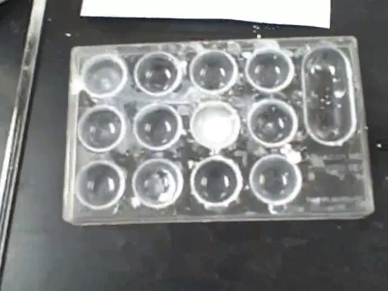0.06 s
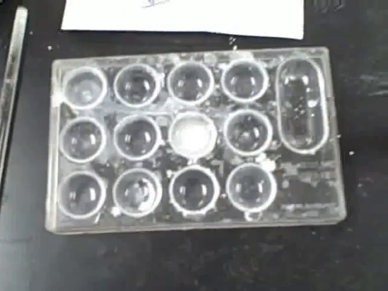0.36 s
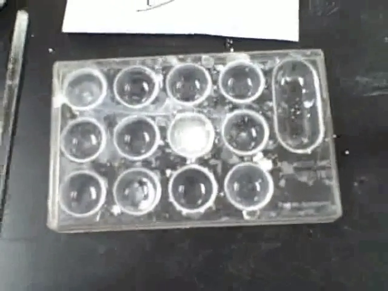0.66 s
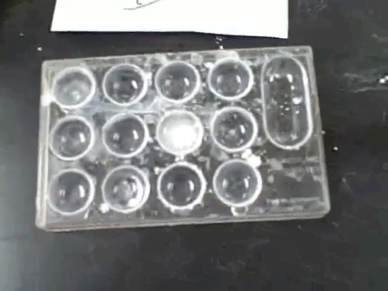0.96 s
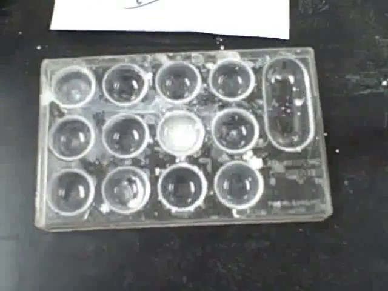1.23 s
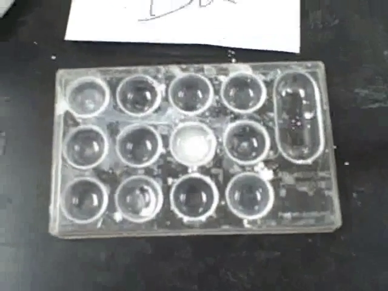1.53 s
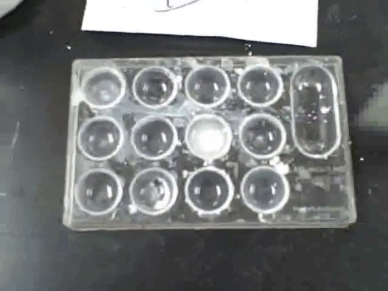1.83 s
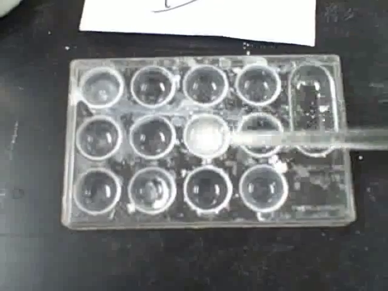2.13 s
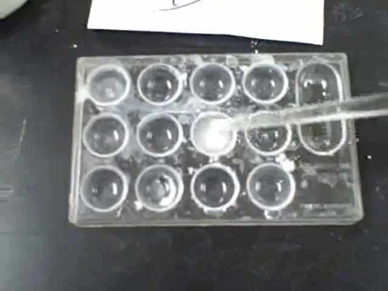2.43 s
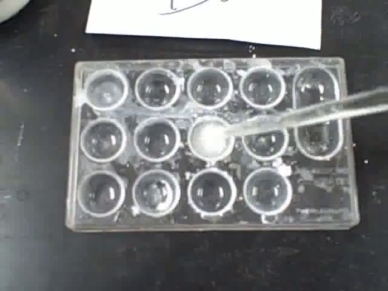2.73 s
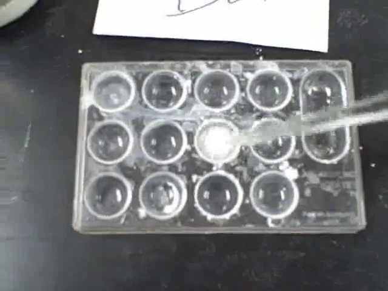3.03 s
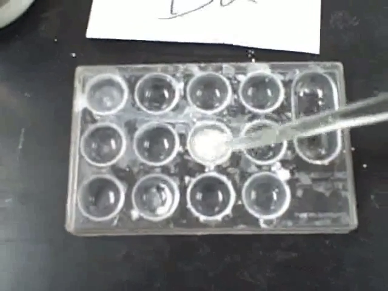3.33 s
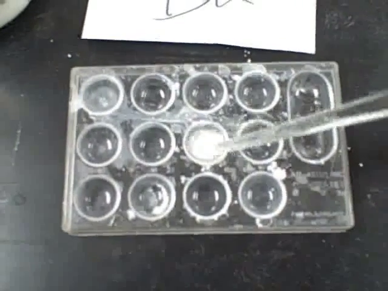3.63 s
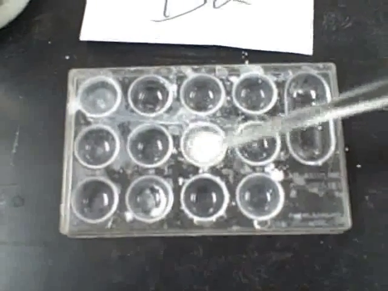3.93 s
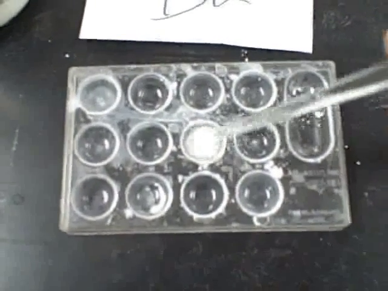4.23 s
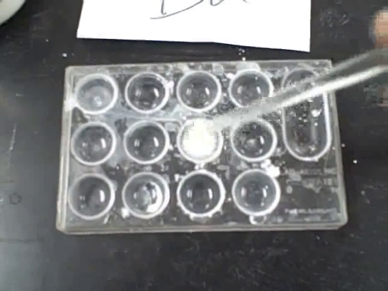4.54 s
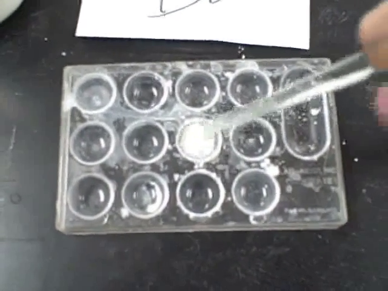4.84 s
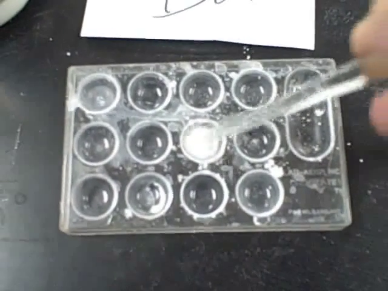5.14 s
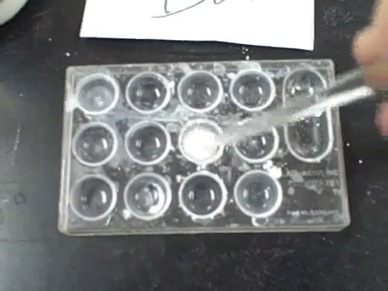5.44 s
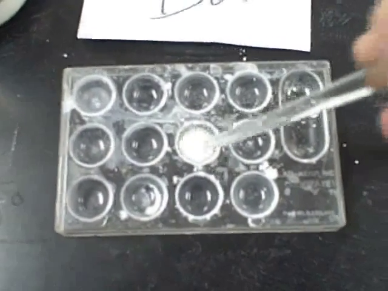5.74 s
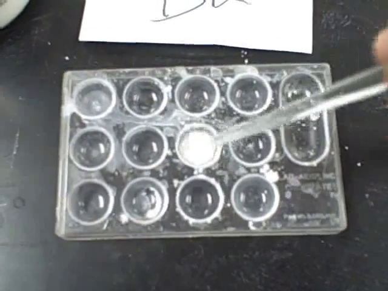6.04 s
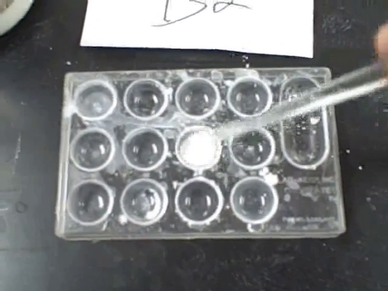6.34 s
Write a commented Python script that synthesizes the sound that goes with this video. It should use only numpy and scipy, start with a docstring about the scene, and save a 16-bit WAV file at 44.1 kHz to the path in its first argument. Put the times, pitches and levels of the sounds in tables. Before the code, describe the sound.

In a small, quiet lab with faint ventilation and mains hum, a glass rod slides softly on the bench and clinks against a second one. A moment later it lands with a short rattle in a plastic well. Then it grinds wet powder in uneven, scratchy strokes, crunching clumps and ticking against the plastic wall, with one bright rasp near the end. All is heard close up.

```python
"""A faint high swish, then a glass rod scuffs over a lab bench and clinks against its neighbour.
It rattles into a well of a plastic plate and stirs wet powder: gritty friction rings plate and rod,
clumps crunch, one with a bright rasp, and the tip taps the well's wall about every half turn.
All of it is close by, in a small, quiet room with ventilation and mains hum."""
import sys
import numpy as np
from scipy import signal
from scipy.fft import rfft, irfft, next_fast_len
from scipy.io import wavfile
from scipy.ndimage import map_coordinates

SR = 44100
rng = np.random.default_rng(int(sys.argv[2]) if len(sys.argv) > 2 else 0)


def unload_wav(signal):
    """Save mono or channel-first audio to the path in sys.argv[1] as 16-bit WAV at rate SR, clipped to [-1, 1]."""
    wavfile.write(
        sys.argv[1],
        SR,
        np.round(np.clip(np.atleast_2d(signal).T, -1, 1) * 32767).astype(np.int16),
    )


N = 286204


def amp(db):
    """Decibels to gain."""
    return 10 ** (np.asarray(db) / 20)


def unit(x):
    """Each row at rms 1."""
    return x / np.sqrt(np.mean(x ** 2, axis=-1, keepdims=True) + 1e-20)


def along(points, hz):
    """(freq_hz, value) points read on a log axis."""
    freqs_hz, values = np.transpose(points)
    return np.interp(np.log(hz + 1), np.log(freqs_hz + 1), values)


def wobble(rate_hz):
    """Smooth random curve."""
    knots = rng.standard_normal(int(N * rate_hz / SR) + 4)
    return map_coordinates(knots, [np.arange(N) * rate_hz / SR])


def filtered(x, response):
    """x through a gain that is a function of frequency."""
    size = next_fast_len(x.shape[-1] + SR // 4)
    return irfft(rfft(x, size) * response(np.fft.rfftfreq(size, 1 / SR)), size)[..., :x.shape[-1]]


def equalised(x, spectrum):
    """x shaped by (freq_hz, gain_db) points."""
    return filtered(x, lambda hz: amp(along(spectrum, hz)))


def coloured(x, spectrum):
    """x equalised, at rms 1."""
    return unit(equalised(x, spectrum))


def add(track, start_s, sound):
    """Mix a sound into the track."""
    part = track[max(round(start_s * SR), 0):][:len(sound)]
    part += sound[:len(part)]


def stroke(start_s, end_s, rise_s, fall_s, ramp_db=0):
    """Stroke gain: up 40 dB in rise_s, a steady change of pressure, down 40 dB in fall_s."""
    t = np.arange(N) / SR
    outside = np.maximum(start_s - t, 0) / rise_s + np.maximum(t - end_s, 0) / fall_s
    progress = np.clip((t - start_s) / (end_s - start_s), 0, 1) - .5
    return amp(ramp_db * progress - 40 * np.minimum(outside, 5))


def grit(slips_per_s, spread_db, hiss_gain):
    """Friction force: tiny slips of very unequal size over a smooth hiss."""
    slipping = rng.random(N) < slips_per_s / SR
    sizes = amp(spread_db * np.clip(rng.standard_normal(N), -2, 2))
    slips = slipping * sizes * rng.choice([-1, 1], N)
    return unit(unit(slips) + hiss_gain * rng.standard_normal(N))


def ring(modes, t, scatter_db):
    """Damped modes; their strengths scatter with the point of contact."""
    out = np.zeros(len(t))
    for k, (hz, width_hz, db) in enumerate(modes):
        strength = (-1) ** k * width_hz * amp(db + scatter_db * rng.standard_normal())
        out += strength * np.exp(-np.pi * width_hz * t) * np.sin(2 * np.pi * hz * t)
    return unit(out)


def rubbed(force, modes):
    """A friction force heard through a body's modes, at rms 1."""
    response = ring(modes, np.arange(SR // 8) / SR, scatter_db=0)
    return unit(signal.fftconvolve(force, response)[:N])


def roaming(x, depth_db, span_hz, span_s):
    """As the contact moves, neighbouring modes swell and fade in patches."""
    hz, t, spectra = signal.stft(x, SR, nperseg=256)
    grid = np.meshgrid(hz / span_hz, t / span_s, indexing="ij")
    patches = map_coordinates(rng.standard_normal((200, 1000)), grid, mode="wrap")
    return unit(signal.istft(spectra * amp(depth_db * patches), SR, nperseg=256)[1][:N])


# room air spectrum: freq_hz, gain_db
AIR_SPECTRUM = [(12, -45.5), (20, -3), (41, -9), (59, -18.5), (123, -15.5), (247, -26), (268, -27),
                (300, -21), (456, -33.5), (554, -33), (797, -34.5), (942, -38), (3130, -45), (10100, -43.5),
                (15800, -44.5)]
# ventilation and mains lines: pitch_hz, rms_db
HUM_LINES = [(30.5, -65.5), (119.8, -66), (240, -77), (570, -75)]

def room_tone(air_db=-56.5):
    """Ventilation rumble with slightly unsteady hum."""
    t, hum = np.arange(N) / SR, np.zeros(N)
    for hz, db in HUM_LINES:
        peak = np.sqrt(2) * amp(db + 0.74 * wobble(1))
        hum += peak * np.sin(2 * np.pi * hz * t + .5 * wobble(0.96))
    return amp(air_db) * coloured(rng.standard_normal(N), AIR_SPECTRUM) + hum


# room decay: freq_hz, t60_s
ROOM_DECAY = [(200, 0.341), (1300, 0.21), (5000, 0.34), (10000, 0.5), (16000, 0.1)]

def reverb(x, build_s=0.0012):
    """The lab's short, diffuse answer."""
    hz, t, spectra = signal.stft(rng.standard_normal(SR // 2), SR, nperseg=256)
    decay = amp(-60 * t / along(ROOM_DECAY, hz)[:, None])
    tail = signal.istft(spectra * decay, SR, nperseg=256)[1]
    tail *= 1 - np.exp(-np.arange(len(tail)) / SR / build_s)
    wet = signal.fftconvolve(x, tail / np.linalg.norm(tail))[:N]
    return equalised(wet, [(300, -21.5), (1300, -9), (5000, -19.5), (10000, -28), (15500, -24)])


def swish(centre_s=0.14, sigma_s=0.072, level_db=-55):
    """Soft, high brushing noise in one bell-shaped swell."""
    spectrum = [(1600, -23), (2300, 1), (2800, -2), (3500, -7.5), (7000, -2.5), (11000, 1.5), (15500, 6)]
    hiss = coloured(rng.standard_normal(N), spectrum)
    swell = np.exp(-.5 * np.minimum(((np.arange(N) / SR - centre_s) / sigma_s) ** 2, 50))
    return amp(level_db) * swell * hiss


# modes of the scuff and of the rod lying damped on the bench: freq_hz, width_hz, level_db
SCUFF_MODES = [(1090, 120, -1.5), (1408, 150, -5.5), (1990, 140, 2), (2430, 310, -1.5), (3234, 390, -1.5),
               (3980, 311, 0.5), (5890, 770, -5.5)]
LYING_ROD_MODES = [(8830, 320, -9), (11950, 300, -4), (12220, 340, 0), (15550, 450, -2)]
# pushes over the bench: start_s, end_s, sing_db, scuff_db
PUSHES = [(0.822, 0.848, -50, -56.5), (0.88, 1.168, -58.5, -69.5), (0.989, 0.988, -61, -68.5)]

def slide(rise_s=0.12, fall_s=0.089):
    """The dragged rod scuffs the bench and faintly sings."""
    force = grit(slips_per_s=1500, spread_db=5, hiss_gain=.7)
    hiss = amp(-1) * coloured(force, [(3000, -22), (7000, 2), (15500, 4.5)])
    sing = roaming(rubbed(force, LYING_ROD_MODES) + hiss, depth_db=2.5, span_hz=500, span_s=.03)
    scuff = rubbed(force, SCUFF_MODES)
    return sum(stroke(start_s, end_s, rise_s, fall_s) * (amp(sing_db) * sing + amp(scuff_db) * scuff)
               for start_s, end_s, sing_db, scuff_db in PUSHES)


# modes of the two rods: pitch_hz, level_db, t60_s
GLASS_MODES = [(5790, -21, .07), (5884, -28, .16), (8545, -11, .11), (8565, -29, .32), (8730, -5, .1),
               (10320, -27, .1), (11812, -1, .085), (11845, -22, .24), (12100, -22, .17), (14300, -25, .1),
               (15430, -17, .06), (15573, 0, .07), (15765, -9, .07)]
# glass on glass: start_s, ring_db, tick_db, bench_re_tick_db
GLASS_HITS = [(1.1962, -31, -31, 0.5), (1.2029, -30.5, -42.5, -4.5), (1.2425, -42, -41.5, -16.5)]

def clinks(snap_t60_s=0.012, bench_t60_s=0.11):
    """The rod bounces off its neighbour: glass snaps, the bench answers, close pairs of modes beat."""
    out, t = np.zeros(N), np.arange(SR // 2) / SR
    spectrum = [(80, -6.5), (500, -6), (1600, -1.5), (4000, -4), (7000, -2), (10000, -5), (15500, 7.5)]
    for start_s, ring_db, tick_db, bench_db in GLASS_HITS:
        chime = np.zeros(len(t))
        for hz, db, t60_s in GLASS_MODES:
            decay = amp(db + .5 * rng.standard_normal() - 60 * t / t60_s)
            chime += decay * np.sin(2 * np.pi * (hz * t + rng.random()))
        noise = coloured(rng.standard_normal(len(t)), spectrum)
        tick = unit(noise * (amp(-60 * t / snap_t60_s) + amp(bench_db - 60 * t / bench_t60_s)))
        add(out, start_s, amp(ring_db) * unit(chime) + amp(tick_db - 0.5) * tick)
    return out


def rasp(start_s=6.177, end_s=6.205, level_db=-38):
    """A dry clump is crushed: crystals break in a dense, bright crackle."""
    force = grit(slips_per_s=900, spread_db=4, hiss_gain=.3)
    spectrum = [(1500, -17), (4000, 0.5), (7000, 0), (10000, -7), (13000, -8), (15500, 1.5)]
    return amp(level_db) * stroke(start_s, end_s, rise_s=0.021, fall_s=0.024) * coloured(force, spectrum)


# register boundaries: crossover_hz
CROSSOVERS_HZ = [880, 2200, 8000]

def registers(x):
    """x split, low to high, into thud, body, clack and edge, each at rms 1."""
    def bands(hz):
        lowpasses = [1 / (1 + (hz / crossover_hz) ** 10) for crossover_hz in CROSSOVERS_HZ]
        return np.diff(lowpasses, axis=0, prepend=0, append=1)
    return unit(filtered(x, bands))


# contact crack, too dense in modes to ring: freq_hz, gain_db
CRACK_SPECTRUM = [(80, -19), (250, -15), (480, 3), (720, 4.5), (1300, 1.5), (2500, -6.5), (4000, -11.5),
                  (6000, -6), (8500, -15), (11000, -10), (14000, -10.5), (16000, -31.5)]

def crack(t, hold_s=0.0043, t60_s=0.038):
    """A burst that lasts while the contact chatters, then dies."""
    noise = coloured(rng.standard_normal(len(t)), CRACK_SPECTRUM)
    return unit(noise * amp(-60 * np.maximum(t - hold_s, 0) / t60_s))


# modes of the plate and of the hand-held rod, tip in the powder: freq_hz, width_hz, level_db
PLATE_MODES = [ (509, 740, -17), (819, 160, -9), (1028.5, 64, 6), (1185, 248, 2.5), (1300, 95, 8),
               (1466, 83, 2), (1624, 18.2, 3), (1707, 46, -5.5), (2370, 194, -15), (2586, 84, -11.5),
               (2777, 50, -13), (2954, 40, -14.5), (3515, 42, -10.5), (3800, 97, -14), (4380, 56, -8.5),
               (4797, 78, -10), (5236, 98, -12), (5675, 78, -9), (6570, 410, -16), (6353, 78, -12.5),
               (7300, 100, -23.5), (8260, 79, -27), ]
HELD_ROD_MODES = [(9500, 160, -16), (10450, 450, -12), (10930, 260, -4), (11320, 240, -4),
                  (12400, 250, -24), (13200, 350, -18), (13800, 350, -17), (14500, 450, -22),
                  (15400, 600, -21)]

def blows(hits, thud_base_db, clack_base_db, trim_db=-18.5):
    """Glass hits plastic: a bare wall gives a round knock, a hard hit or trapped powder a bright snap."""
    out, t = np.zeros(N), np.arange(SR // 8) / SR
    for start_s, level_db, edge_db in hits:
        # harder contacts spread the spectrum, crack more and ring less
        thud_db = thud_base_db + 0.44 * edge_db
        clack_db = clack_base_db + 0.39 * edge_db
        blow = ring(PLATE_MODES + HELD_ROD_MODES, t, scatter_db=1.5) + amp(0.064 * clack_db) * crack(t)
        balanced = amp([thud_db, 0, clack_db, edge_db]) @ registers(blow)
        add(out, start_s, amp(level_db + trim_db) * balanced)
    return out


# hits on the plate and on the well's wall: start_s, level_db, edge_re_body_db
LANDING_HITS = [(2.302, -19.5, -3.5), (2.3042, -20.5, 7), (2.3144, -21.5, -22.5), (2.3215, -22.5, -25),
                (2.3416, -27, -25), (2.3631, -31.5, -32), (2.6115, -34.5, -46), (2.6173, -27.5, -28),
                (2.6239, -30.5, -18.5)]
WALL_HITS = [(3.3693, -30.5, -12), (3.6407, -31.5, 4.5), (3.662, -35, -22), (3.917, -37.5, 1),
             (4.1543, -32.5, -2), (4.1872, -34.5, -18), (4.508, -32.5, -4), (4.6735, -16.5, -23),
             (4.8203, -40.5, 9.5), (4.8637, -48, 14), (4.9504, -23, -19.5), (4.9846, -41, 0),
             (5.226, -16.5, -19), (5.2377, -26, -11), (5.256, -32, -14), (5.473, -25, -12.5),
             (5.4993, -27.5, -36), (5.6534, -33, -5), (5.7265, -16.5, -19), (6.008, -30, -8),
             (6.2569, -16, -22.5), (6.45, -40, 7.5)]

def taps():
    """The rod lands, rattles and settles in the well, then taps the wall as it goes round."""
    landing = blows(LANDING_HITS, thud_base_db=0, clack_base_db=6.5)
    return landing + blows(WALL_HITS, thud_base_db=-9.5, clack_base_db=-3.5)


# stirring strokes: start_s, end_s, rub_db, powder_re_rub_db, pressure_ramp_db
STIR_STROKES = [(2.714, 2.774, -50, -3, 1), (2.911, 3.079, -46.5, -3, 0.5), (3.101, 3.244, -45.5, -6, 0.5),
                (3.257, 3.313, -42, -7.5, 7), (3.394, 3.574, -45, -3, 4.5), (3.673, 3.874, -48.5, -1.5, 7),
                (3.908, 4.112, -44.5, -3, -2), (4.183, 4.297, -44, -2, 8.5), (4.357, 4.411, -42, -2, 7),
                (4.443, 4.541, -42, -6, 3), (4.584, 4.62, -53, 7, 5), (4.696, 4.902, -49.5, 1.5, -4.5),
                (5.008, 5.092, -40, -7, 2), (5.127, 5.216, -45.5, -3.5, -9),
                (5.253, 5.454, -43.5, -5.5, -4), (5.491, 5.7, -45.5, -4.5, -1.5),
                (5.759, 5.827, -45.5, -4.5, 6), (5.844, 5.873, -37.5, -2, -2),
                (5.927, 5.978, -40, -2, -5.5), (5.991, 6.215, -44.5, -2.5, 9.5),
                (6.299, 6.468, -45.5, -4, -4)]
# powder clumps under the tip: start_s, crunch_db
POWDER_CLUMPS = [(3.065, -42), (3.456, -41), (3.763, -39.5), (3.962, -45), (4.216, -36), (4.259, -39.5),
                 (4.294, -41), (4.34, -38.5), (4.395, -45.5), (4.443, -47.5), (4.539, -39), (4.75, -34.5),
                 (4.817, -37), (4.985, -40), (5.044, -43), (5.128, -49), (5.302, -42), (5.375, -42.5),
                 (5.56, -44), (5.587, -46), (5.951, -42.5), (6.33, -42), (6.352, -36.5), (6.39, -42)]

def friction_gains(clump_hold_s=0.0082, clump_drag_db=-4):
    """Gains of rubbing on plastic and of powder crunch; clumps give way at once, then crumble."""
    rub_power, crunch_power = np.zeros(N), np.zeros(N)
    for start_s, end_s, rub_db, powder_db, ramp_db in STIR_STROKES:
        pressure = amp(rub_db) * stroke(start_s, end_s, rise_s=0.019, fall_s=0.023, ramp_db=ramp_db)
        rub_power += pressure ** 2
        crunch_power += (amp(powder_db) * pressure) ** 2
    clumps = sum(amp(crunch_db) * stroke(start_s, start_s + clump_hold_s, rise_s=0.013, fall_s=0.059)
                 for start_s, crunch_db in POWDER_CLUMPS)
    return np.sqrt(rub_power + (amp(clump_drag_db) * clumps) ** 2), np.sqrt(crunch_power + clumps ** 2)


def stirring():
    """The tip rubs round the well and grinds the powder; every slip rings the plate and the rod."""
    force = grit(slips_per_s=900, spread_db=5, hiss_gain=.4) * amp(1.8 * wobble(70))
    ringing = rubbed(force, PLATE_MODES + HELD_ROD_MODES) + amp(-10) * coloured(force, CRACK_SPECTRUM)
    ringing = roaming(ringing, depth_db=2.8, span_hz=500, span_s=.028)
    thud, body, clack, edge = registers(ringing)
    rub, crunch = friction_gains()
    low = rub * (amp(-11) * thud + amp(-2.5) * body)
    middle = amp(-4.5) * np.sqrt(rub * crunch) * clack
    high = amp(-0.5) * crunch * edge
    spectrum = [(200, -17), (700, 1), (1300, -2.3), (2500, 0.5), (5000, 0.27), (6500, 0),
                (8000, 6.5), (11000, -1), (15000, -0.8)]
    return equalised(low + middle + high, spectrum)


def scene():
    """Rod and plate close by, in the room; mono."""
    near = swish() + slide() + clinks() + taps() + stirring() + rasp()
    return (near + reverb(near) + room_tone())[None]


def record(dry):
    """Soft peak limiter, then a steep low-pass."""
    ceiling, cutoff_hz, taper_hz = .8, 15900, 250
    rounded = dry / (1 + (dry / ceiling) ** 4) ** (1 / 4)
    return filtered(rounded, lambda hz: np.clip((cutoff_hz - hz) / taper_hz + .5, 0, 1))


dry = scene()
out = record(dry)
unload_wav(out)
```